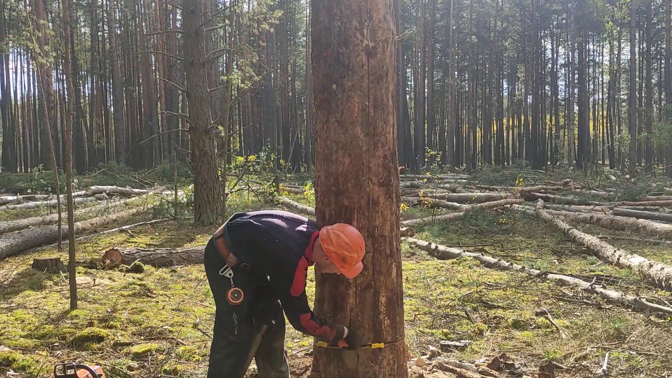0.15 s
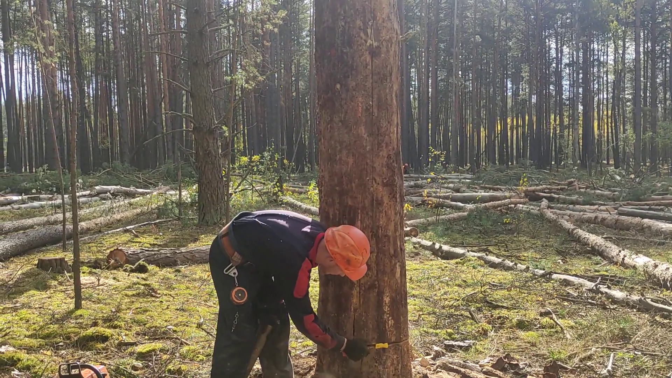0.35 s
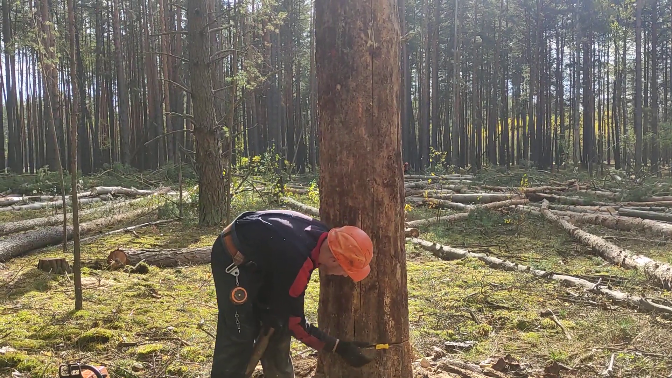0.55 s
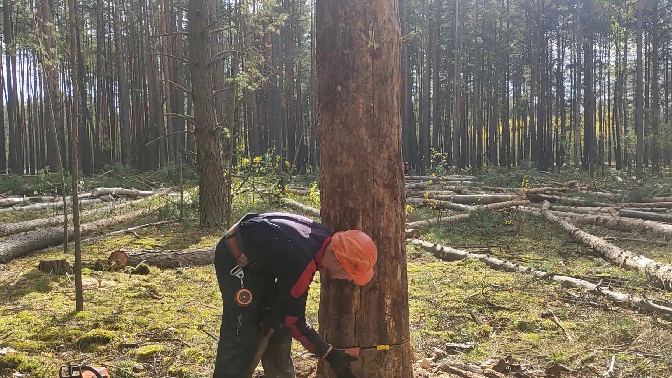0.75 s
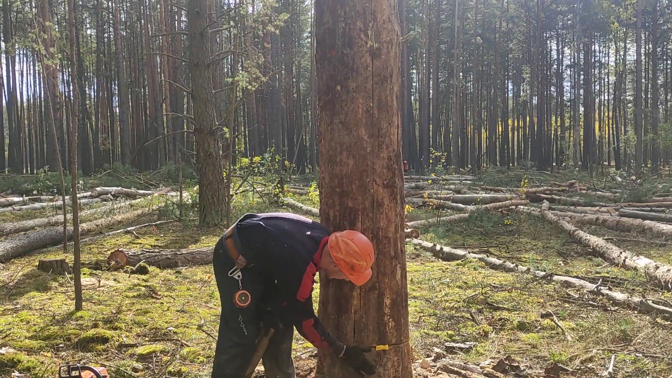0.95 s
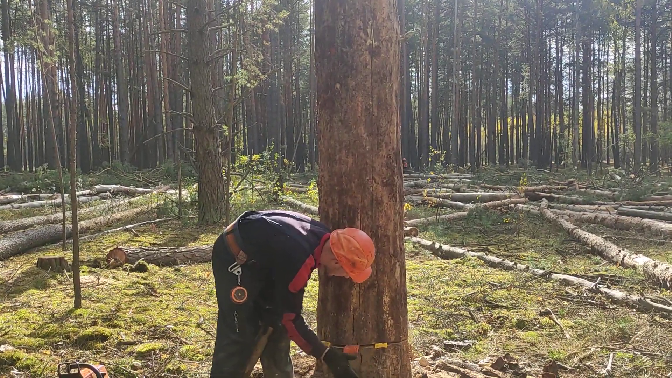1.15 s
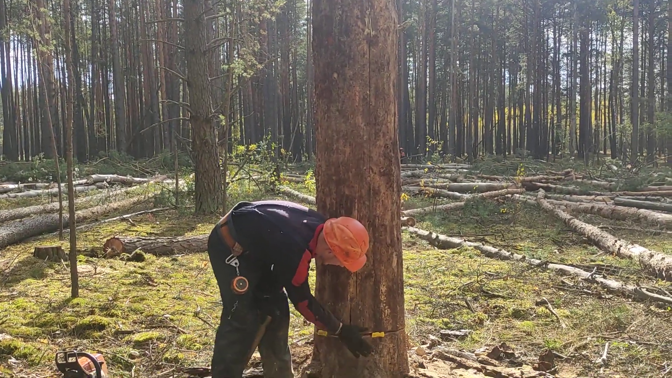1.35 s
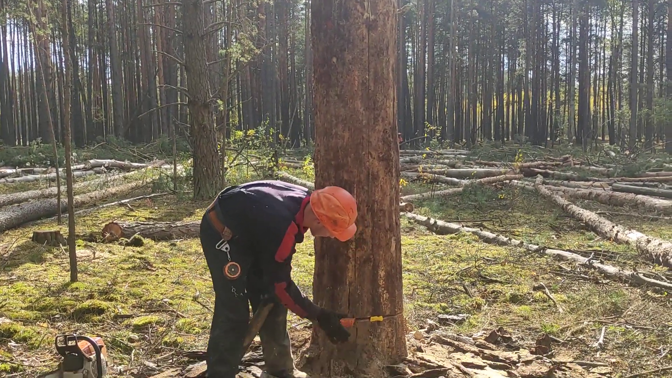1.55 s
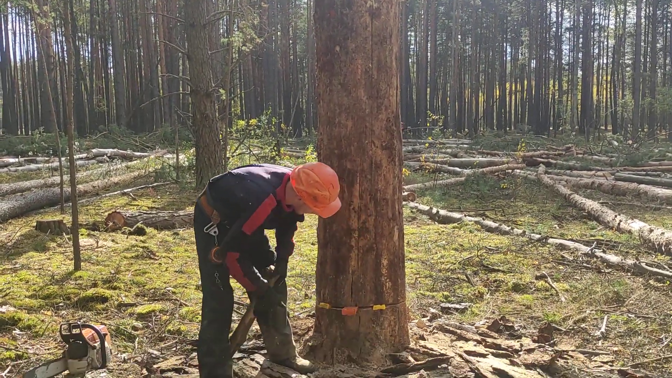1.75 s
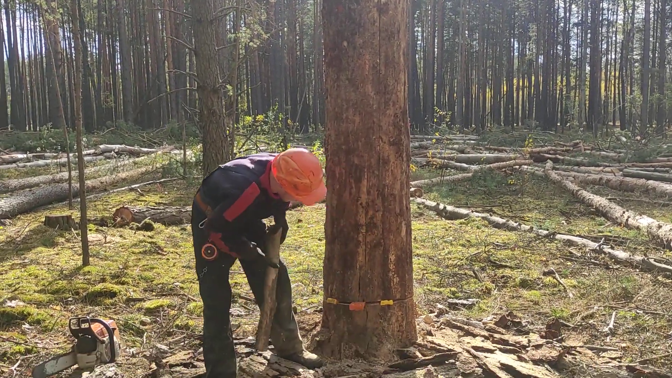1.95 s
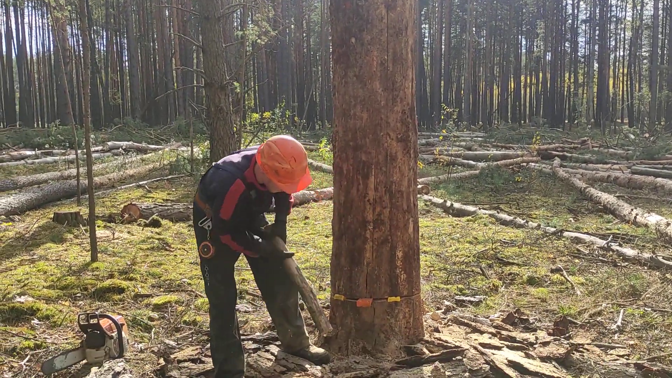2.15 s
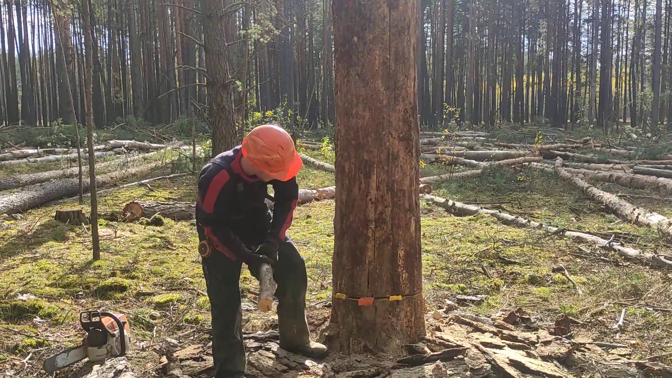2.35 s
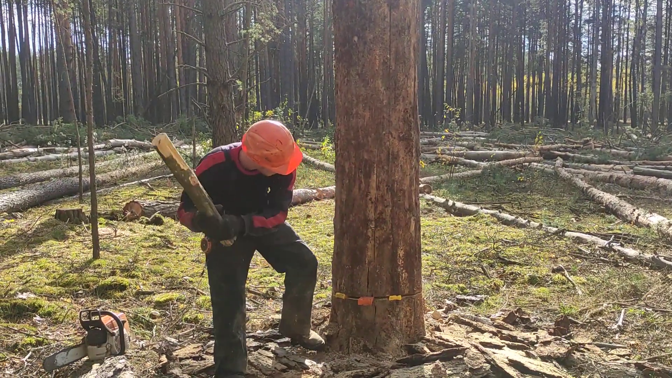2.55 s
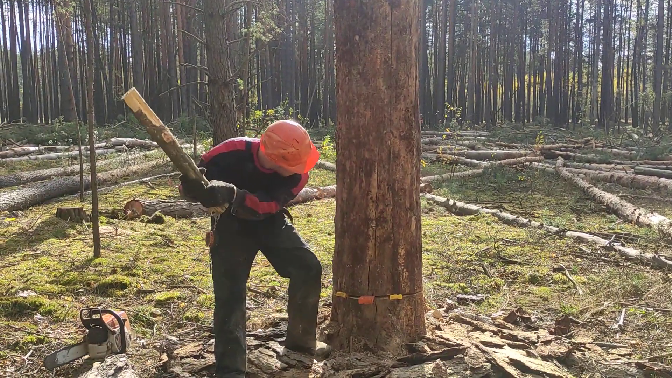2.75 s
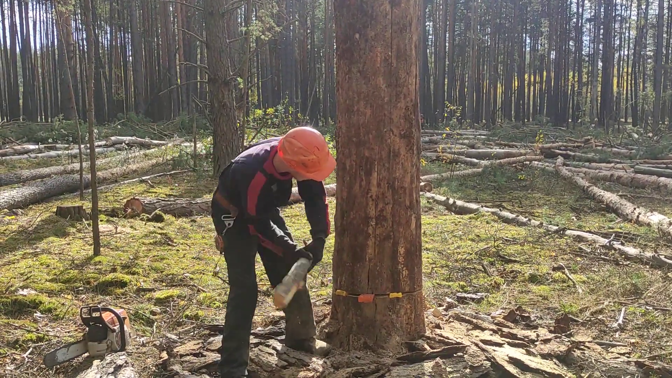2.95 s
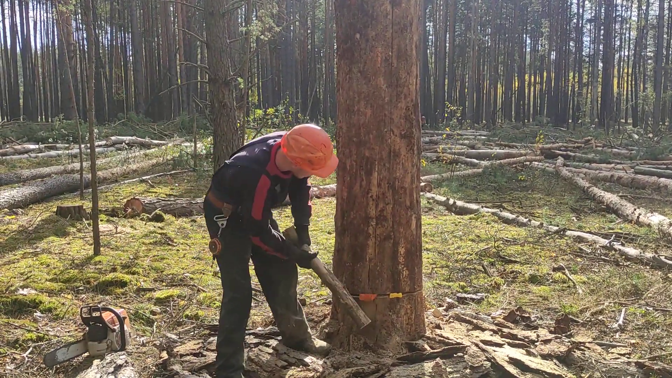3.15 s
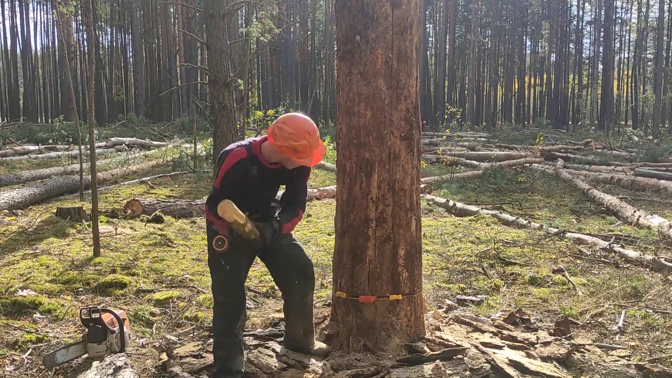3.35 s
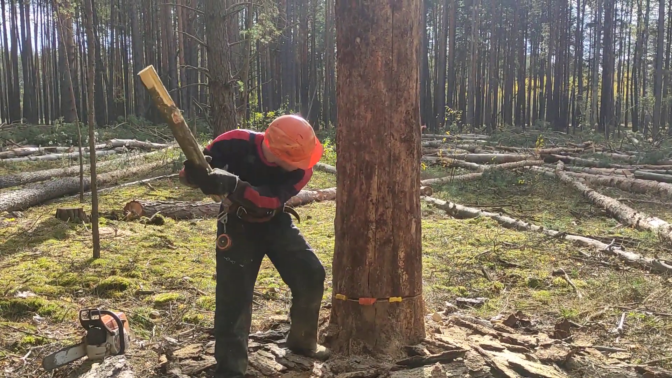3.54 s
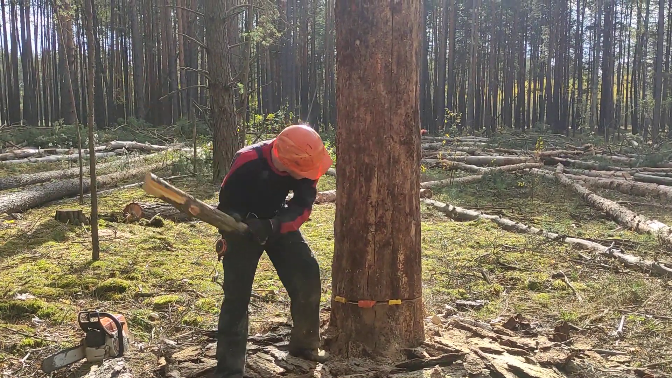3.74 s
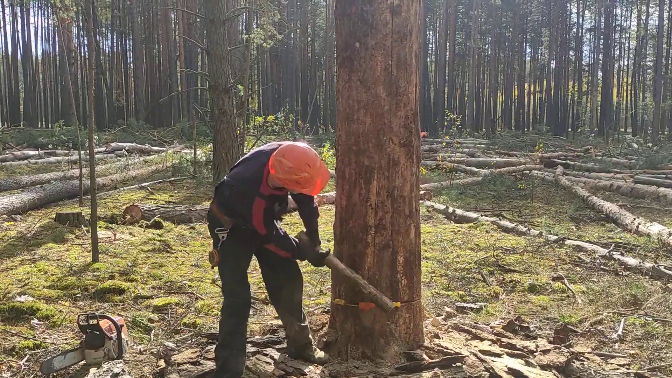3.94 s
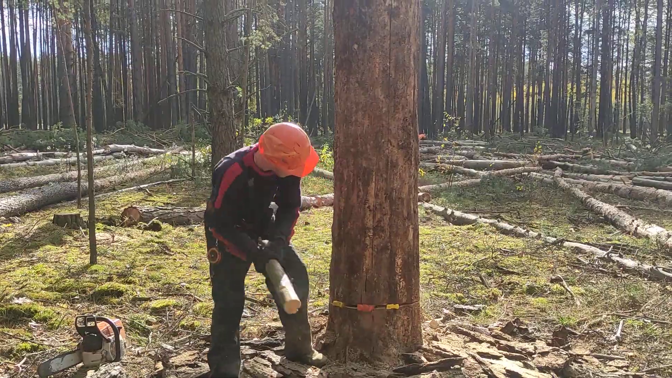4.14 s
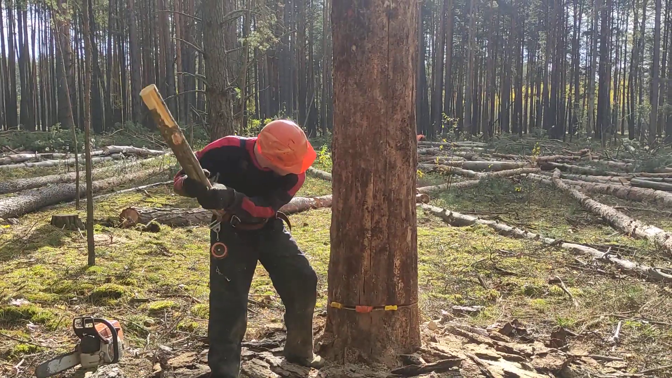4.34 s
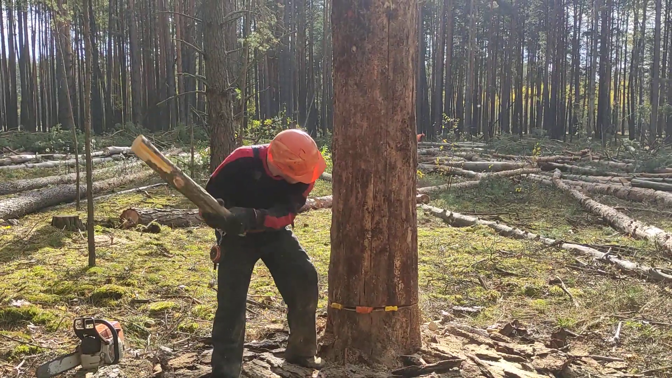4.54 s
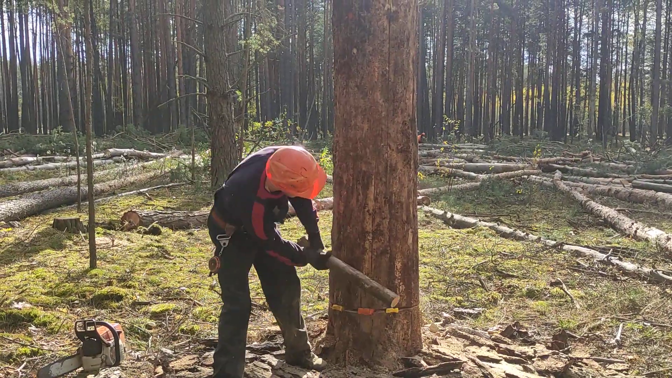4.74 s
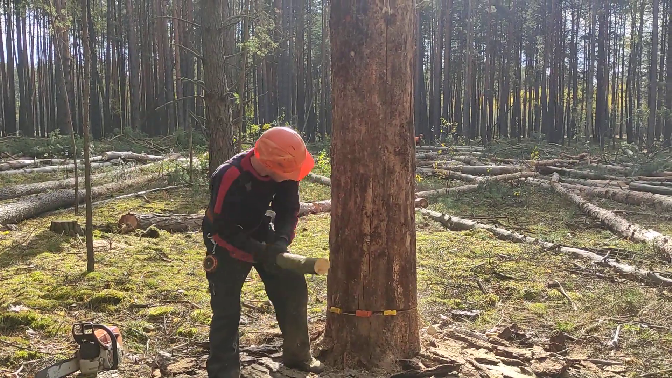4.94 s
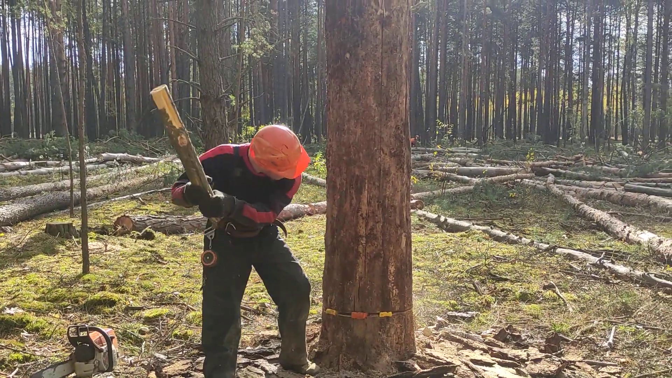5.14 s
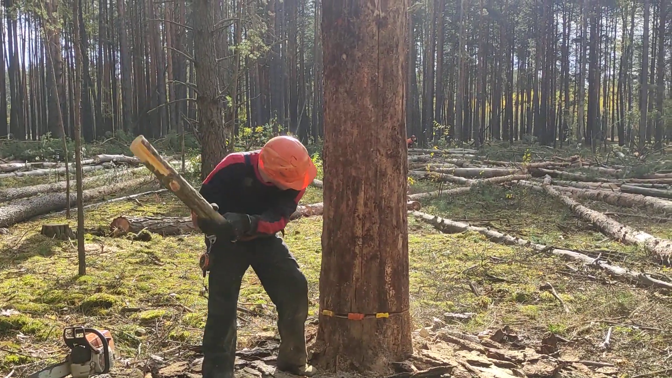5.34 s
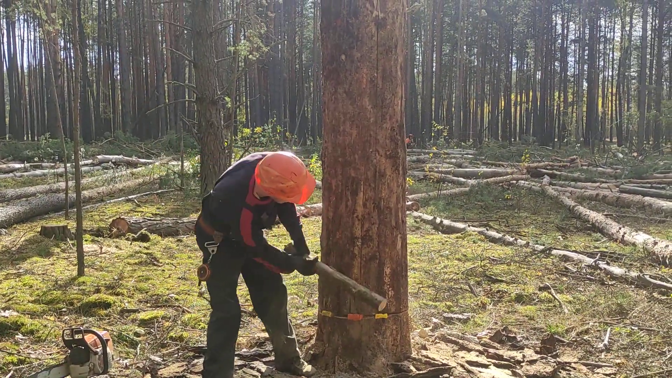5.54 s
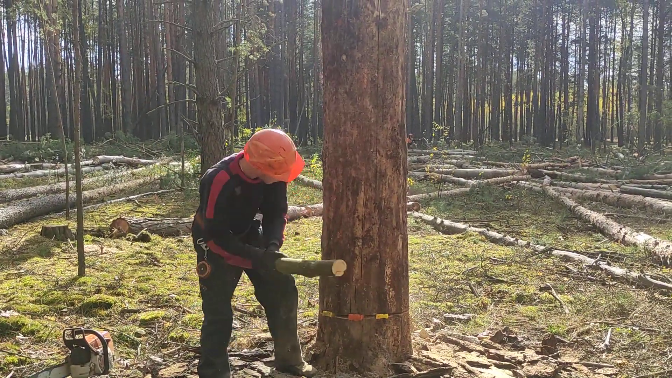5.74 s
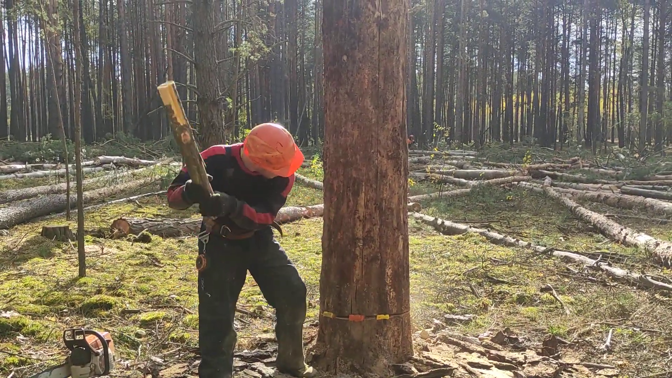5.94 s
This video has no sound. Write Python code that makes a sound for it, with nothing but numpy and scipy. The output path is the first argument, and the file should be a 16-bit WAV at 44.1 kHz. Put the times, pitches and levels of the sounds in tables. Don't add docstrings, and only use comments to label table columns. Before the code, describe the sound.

A quiet open forest, with soft steady wind in the crowns and low, lumpy wind bumps on a microphone a few metres from the worker, strongest around 0.4 and 1.6 s. Faint cloth rustle and small litter snaps open the scene. At 0.9 s a light, dull wooden tap sets the wedge; at 1.4 s a firmer, more ringing tap follows. From 1.5 to 3 s clothes rub, litter crackles, twigs snap, notably near 2.4 s, and thin dry clicks flick by. Heavy club blows land at about 3.1, 4.0, 4.8 and 5.6 s, each louder: blunt hollow knocks with a low thump, a brief ground shudder and a smeared echo swelling about a quarter second later. The second is short and hard; the last is loudest and fullest, slightly compressed. Rustling movements fill the gaps, the breeze strengthens towards the end, and the last echo fades by about 6.1 s.

```python
import sys
import numpy as np
from scipy import signal
from scipy.fft import rfft, irfft
from scipy.io import wavfile
from scipy.ndimage import uniform_filter1d

SR = 44100
rng = np.random.default_rng(int(sys.argv[2]) if len(sys.argv) > 2 else 0)


def int16_out(signal):
    q = np.round(np.clip(np.atleast_2d(signal).T, -1, 1) * 32767)
    wavfile.write(sys.argv[1], SR, q.astype(np.int16))


def magnitude_from_level(level_db):
    exponent = np.asarray(level_db, float) / 20
    return 10 ** exponent


N = 268569


def evened(x):
    return x / np.sqrt(np.mean(x ** 2) + 1e-20)


def read(points, hz):
    f, value = np.transpose(points)
    return np.interp(np.log(hz + 1), np.log(f + 1), value)


def coloured(x, points):
    hz = np.fft.rfftfreq(len(x), 1 / SR)
    return irfft(rfft(x) * magnitude_from_level(read(points, hz)), len(x))


def curve(rows):
    return magnitude_from_level(np.interp(np.arange(N) / SR, *np.transpose(rows)))


def swells(rows, rest_db):
    t = np.arange(0, N + 64, 64) / SR
    power = magnitude_from_level(rest_db) ** 2
    for middle, length, db in rows:
        power = power + magnitude_from_level(db - 24 * ((t - middle) / length) ** 2) ** 2
    return np.interp(np.arange(N) / SR, t, np.sqrt(power))


def flicker(size, depth_db):
    wander = uniform_filter1d(uniform_filter1d(rng.standard_normal(N), size), size)
    return magnitude_from_level(depth_db * evened(wander))


def add(mix, s, sound):
    part = mix[round(s * SR):][:len(sound)]
    part += sound[:len(part)]


def ring(x, hz, width):
    r = np.exp(-np.pi * width / SR)
    return signal.lfilter([1 - r, 0, r - 1], [1, -2 * r * np.cos(2 * np.pi * hz / SR), r * r], x)


# (time [s], level [dB])
BREEZE = [(0, -61.5), (1.37, -63.5), (1.95, -63), (2.78, -58), (3.5, -66.5), (4.1, -61), (4.65, -61.5),
          (5.0, -52.5), (5.45, -58), (5.85, -51.5), (6.09, -52.5)]
# (frequency [Hz], level [dB per Hz])
CROWN_COLOUR = [(88, -45), (150, -18.5), (284, 6), (334, 3.5), (661, -0.5), (987, -3.5), (1250, -21),
                (1760, -10), (3430, -42), (3750, -44.5), (5200, -36), (6760, -72), (11400, -120)]


def air():
    gusts = flicker(1500, 1.2)
    return curve(BREEZE) * magnitude_from_level(3.0) * gusts * evened(coloured(rng.standard_normal(N), CROWN_COLOUR))


# (middle [s], length [s], level [dB])
GUSTS = [(.3, 0.57, -44), (.95, 0.48, -53.5), (1.6, 0.3, -42.5), (2.0, 0.083, -52), (2.75, 0.81, -53.5),
         (3.4, 0.35, -44.5), (3.75, 0.21, -52.5), (4.15, 0.55, -51), (4.82, 0.13, -41), (5.12, .15, -42),
         (5.5, 0.12, -47), (5.9, 0.23, -54)]
# (frequency [Hz], level [dB])
WIND_COLOUR = [(20, -14.5), (40, 3.5), (70, 15), (130, 6), (220, 4), (400, -30.5)]
# (time [s], peak level [dB], frequency [Hz])
PUFFS = [(0.084, -48.5, 108), (0.139, -39, 88), (0.194, -41, 95), (0.4, -25, 197), (0.415, -27.5, 128),
         (0.461, -29, 114), (0.515, -35.5, 107), (0.538, -41.5, 137), (1.199, -37.5, 85), (1.517, -37, 112),
         (1.588, -28, 99), (1.612, -36.5, 113), (1.66, -36.5, 101), (1.741, -41, 115), (2.552, -40.5, 85),
         (2.789, -37, 162), (3.085, -30, 101), (3.199, -30, 239), (4.208, -39, 131), (4.911, -39, 209),
         (4.968, -40, 170), (5.034, -37, 140), (5.188, -33.5, 105), (5.204, -35, 98), (5.233, -39.5, 98),
         (5.764, -40, 172), (2.018, -38.5, 180), (5.833, -32.5, 137), (5.994, -40, 104), (6.034, -38, 82)]
CALM_DB = -56.5
PUFF_CYCLES = 0.87


def wind():
    lumps = flicker(900, 3.5)
    rumble = evened(coloured(rng.standard_normal(N), WIND_COLOUR))
    out = swells(GUSTS, CALM_DB) * magnitude_from_level(-10.0) * lumps * rumble
    t = np.arange(-1300, 1300) / SR
    for (s, db, hz), turn in zip(PUFFS, rng.random((len(PUFFS), 1))):
        shape = np.exp(-np.log(16) * (t * hz / PUFF_CYCLES) ** 2)
        add(out, s + t[0], magnitude_from_level(db) * shape * np.cos(2 * np.pi * (hz * t + turn)))
    return out


# (middle [s], length [s], effort [dB], crispness [dB])
MOVES = [(0.03, 0.2, -64, -6.5), (1.06, 0.26, -60.5, -23), (1.534, 0.2, -54, -8), (1.854, 0.22, -51, -8.5),
         (2.187, 0.9, -59, -15.5), (2.45, 0.29, -59.5, -10), (2.83, 0.52, -54, -12.5),
         (3.284, 0.38, -51, -23.5), (3.715, .4, -61, -10.5), (4.142, 0.28, -46, -32.5),
         (4.62, 0.61, -56, -19), (5.16, .3, -53.5, -20), (5.852, 0.51, -52.5, -31), (6.09, 0.29, -65, -10)]
REST_DB, REST_CRISP_DB = -66.5, -14
JOLT_DB, JOLT_S = -56.5, 0.058


def crispness():
    jolts = [(s, JOLT_S, JOLT_DB) for s, *_ in BLOWS[1:]]
    crisp = [(s, length, db + crisp_db) for s, length, db, crisp_db in MOVES]
    return swells(crisp + jolts, REST_DB + REST_CRISP_DB)


# (frequency [Hz], level [dB])
FIZZ = [(3600, -36), (4500, -6.5), (5600, -30), (5900, 0), (6700, -4.5), (7500, -4)]
# (frequency [Hz], level [dB])
CLOTH = [(300, 2), (700, -2.5), (1500, -1.5), (2300, -7), (3500, -12), (3800, -10.5), (5000, -19)]


def rustle():
    sizes = magnitude_from_level(4 * np.minimum(rng.exponential(1, N), 3))
    grains = evened(sizes * (rng.random(N) < 900 / SR) * rng.choice([-1, 1], N))
    clumps = flicker(130, 2.6) * flicker(1200, 1.8)
    fizz = clumps * evened(coloured(0.4 * grains + rng.standard_normal(N), [(3000, -50)] + FIZZ))
    cloth = clumps * evened(coloured(0.14 * grains + rng.standard_normal(N), CLOTH))
    effort = swells([move[:3] for move in MOVES], REST_DB)
    return crispness() * magnitude_from_level(5.0) * fizz + effort * magnitude_from_level(-7.5) * cloth


# (frequency [Hz], level [dB])
MICROPHONE_DIP = [(3400, -5.5), (3800, -5.5), (5400, 1.5), (5900, 3)]
CRACKLES_PER_S, CRACKLE_DB = 160, 5


def crackles():
    sizes = magnitude_from_level(4.5 * np.minimum(rng.exponential(1, N), 4))
    train = (rng.random(N) < CRACKLES_PER_S / SR) * sizes * rng.choice([-1, 1], N)
    snaps = evened(ring(train, 7000, 1500)) + magnitude_from_level(-8) * evened(ring(train, 2200, 2200))
    return magnitude_from_level(CRACKLE_DB - 9) * crispness() * coloured(snaps, MICROPHONE_DIP)


# (time [s], peak level [dB], treble [dB re peak], body [dB re peak])
TICKS = [(0.1485, -49, -5.5, -3), (0.168, -46, -20, 1), (0.2102, -39.5, -6, 2), (0.3358, -50.5, -8, -15),
         (0.9287, -27.5, -34, 6), (1.1476, -49.5, -1, -6), (1.388, -44.5, -1, -9), (1.4078, -47, -35, -31),
         (1.5284, -49.5, -18, 13.5), (1.5525, -30.5, -12, -1.5), (1.5858, -43, -7, -28),
         (1.6137, -49, 1, -15), (1.8798, -37, -3, -4), (1.939, -73, -13, -27), (2.0125, -39.5, -6.5, 3),
         (2.302, -47, 3.5, 16), (2.3957, -26, -9, -6.5), (2.4607, -44, 0, -4), (2.7836, -44, -4, -16),
         (2.8454, -47.5, 2, 1), (2.9623, -43, -24, 5), (3.0746, -46, -4.5, -18), (3.1924, -21.5, -45, 0.5),
         (3.358, -34.5, -12.5, -4), (3.6166, -44.5, 5, -14), (3.933, -54.5, 1, -10),
         (4.4648, -38.5, -5.5, -20), (4.8844, -46, -23, 12), (5.3884, -57, 0.5, 11), (5.5777, -48.5, 0, 0)]


def ticks():
    out, t = np.zeros(N), np.arange(900) / SR
    decay = np.exp(-t / 0.00057) + 0.13 * np.exp(-t / 0.0058)
    bursts = rng.standard_normal((len(TICKS), 900)) * decay * (1 - np.exp(-t / 0.00027))
    for (s, peak_db, treble_db, body_db), burst in zip(TICKS, bursts):
        parts = [ring(ring(burst, hz, w), hz, w) for hz, w in [(2020, 1230), (6570, 1800), (724, 430)]]
        levels = magnitude_from_level([peak_db, peak_db + treble_db + 3, peak_db + body_db])
        add(out, s, sum(g * p / abs(p).max() for g, p in zip(levels, parts)))
    return coloured(out, MICROPHONE_DIP)


# (frequency [Hz], level [dB])
CRACK = [(200, -17.5), (700, -76.5), (1600, 17), (3000, -27.5), (5000, -11), (6500, -2.5), (7600, -28)]


def blow(peak_db, contact_ms, thump_db, wood, later_ms, again_db, share, crack_db):
    t = np.arange(SR // 5) / SR
    late = t - later_ms / 1000
    again = magnitude_from_level(again_db) * (late > 0) * np.exp(-abs(late) / .002)
    grip = (np.exp(-t * 1000 / contact_ms) + again) * (1 - np.exp(-t / 0.0012))
    chatter = rng.standard_normal(len(t)) * grip
    first_push = .5 * np.exp(-((t - .0003) / .0001) ** 2)
    second_push = -.3 * magnitude_from_level(again_db) * np.exp(-(late / .0001) ** 2)
    drive = first_push + second_push + share * chatter
    tone = sum(magnitude_from_level(db) * ring(drive, hz, 0.55 * w + 55 + 0.012 * hz) for hz, w, db in wood)
    crack = magnitude_from_level(crack_db) * coloured(coloured(chatter, CRACK), MICROPHONE_DIP)
    knock = (tone + crack) * (t < 1 / 8)
    thump = np.sin(2 * np.pi * 82 * t) * np.exp(-((t - .005) / 0.0059) ** 2)
    return magnitude_from_level(peak_db) * knock / abs(knock).max() + magnitude_from_level(thump_db) * thump


# (delay [s], level [dB])
NEAR = [(0.01, -16.5), (.021, -19.5), (.031, -31.5), (.040, -26.5)]
# (frequency [Hz], level [dB])
BARK = [(200, -3.5), (1500, -6), (3000, -6.5), (5000, -11), (7500, -34.5)]
# (delay [s], level [dB])
FAR = [(.005, 4), (0.042, -10), (0.088, -3), (.16, -12.5), (0.242, -1.5), (0.351, -3), (.55, -10.5),
       (0.851, -14.5), (1.3, -12)]
# (frequency [Hz], level [dB])
FAR_COLOUR = [(100, 5), (300, -1.5), (1000, 2), (2000, -3), (3500, -16), (6000, -15)]


def forest(sound, echo_db, stretch, tilt_db):
    t = np.arange(int(1.5 * SR)) / SR
    delay, db = np.transpose(FAR)
    taps = rng.choice([-1., 0., 1.], len(t), p=[.04, .92, .04])
    colour = [(hz, gain_db + tilt_db * np.log2(hz / 1000)) for hz, gain_db in FAR_COLOUR]
    swell_db = np.interp(t, delay * stretch, db, left=-90)
    tail = coloured(taps, colour) * magnitude_from_level(swell_db + echo_db - 22.0)
    near = np.zeros(len(t))
    for s, near_db in NEAR:
        add(near, s, magnitude_from_level(near_db - 24.5) * rng.standard_normal(300) * np.hanning(300))
    tail += coloured(near, BARK)
    tail[0] = 1
    return signal.fftconvolve(sound, tail)


def shudder(db, start_hz, end_hz, t60):
    t = np.arange(SR // 2) / SR
    hz = end_hz + (start_hz - end_hz) * np.exp(-t / 0.11)
    turn = np.exp(2j * np.pi * np.cumsum(hz) / SR)
    r = np.exp(-np.pi * 130 / SR)
    slow = rng.standard_normal(len(t)) / turn
    for _ in range(2):
        slow = signal.lfilter([1 - r], [1, -r], slow)
    waves = (1 - np.exp(-t / .003)) * (1 + .8 * np.exp(-((t - .038) / .009) ** 2))
    return magnitude_from_level(db - 60 * t / t60) * waves * evened((turn * slow).real)


# (time [s], peak level [dB], contact length [ms], low thump [dB])
BLOWS = [
    (0.932, -15, 8.8, -46),
    (1.4300, -5, 3.8, -27),
    (3.1382, 1, 3.5, -27),
    (3.9910, 3.5, 1.92, -17.5),
    (4.819, 6, 3.8, -21),
    (5.6246, 7.5, 4.5, -18.5),
]
# (frequency [Hz], width [Hz], level [dB])
WOOD_1 = [(300, 60, -22), (536, 24, -2.5), (670, 20, 3.5), (859, 35, 4.5), (1790, 160, -4.5),
          (2086, 60, -8.5), (2700, 130, -37)]
WOOD_2 = [(304, 68, 2), (670, 22, 7.5), (929, 14, 1), (1800, 29, -3.5), (2105, 160, 2.5), (2620, 58, -32),
          (3400, 62, -61)]
WOOD_3 = [(353, 59, -3), (589, 246, 14), (935, 260, -21), (1730, 390, -16), (2480, 77, -73.5),
          (2720, 180, -29.5), (3400, 130, -30)]
WOOD_4 = [(293, 47, -18), (683, 360, 4.5), (927, 340, 6), (1267, 400, -2.5), (1595, 200, -1.5),
          (1930, 140, -21.5), (2600, 110, -34.5), (2810, 44, -17), (3400, 730, -25)]
WOOD_5 = [(307, 22, 3), (669, 230, -1.6), (830, 120, 4), (953, 180, 2.5), (1235, 550, -1), (1597, 240, 0),
          (2180, 100, -22), (3130, 460, -8)]
WOOD_6 = [(335, 17, 15.5), (582, 30, 16.5), (692, 390, 15), (1000, 900, -8), (1362, 610, 16),
          (1485, 110, -12.5), (2060, 150, -29), (2900, 250, -20)]
# (delay [ms], level [dB], chatter share [0-1], crack [dB])
REBOUND = [(5.8, 7.5, 0.44, -29), (1.935, 18, 0.11, -25), (2.817, 2.5, 0.25, -17), (2.34, -6, 0.36, -14.5),
           (1.3, -2.5, 0.09, -33.5), (1.31, -20, 0.08, -32)]
# (level [dB], delay [factor], tilt [dB per octave])
ECHOES = [(-39, 0.92, -9), (-34, 1.5, 2), (-31.5, 0.74, 3.5), (-27.5, 0.79, 3.5), (-33.5, 0.97, 3.4),
          (-29, 1.11, -1.5)]
# (level [dB], start frequency [Hz], end frequency [Hz], t60 [s])
SHUDDER = [(-35, 223, 120, 0.17), (-37, 240, 240, 0.27), (-40.5, 355, 100, 0.6), (-40, 220, 110, 0.43),
           (-31, 306, 124, 0.49), (-26.5, 370, 120, 0.4)]


def club():
    out, woods = np.zeros(N), (WOOD_1, WOOD_2, WOOD_3, WOOD_4, WOOD_5, WOOD_6)
    for (s, *hit), wood, again, echo, low in zip(BLOWS, woods, REBOUND, ECHOES, SHUDDER):
        add(out, s, forest(blow(*hit, wood, *again), *echo))
        add(out, s, shudder(*low))
    return out


# (time [s], peak level [dB])
CLICKS = [(1.515, -53), (1.625, -41), (1.7335, -50), (1.751, -46), (1.793, -44.5), (2.4308, -47),
          (2.4887, -44), (2.6608, -45), (2.704, -47), (2.7612, -42.5), (2.8177, -38), (2.8675, -47),
          (2.9084, -56), (2.9807, -41.5), (3.7065, -56), (3.7824, -50), (4.7037, -49), (5.125, -47),
          (5.237, -48)]


def clicks():
    out, t = np.zeros(N), np.arange(300) / SR
    bursts = rng.standard_normal((len(CLICKS), 300)) * np.exp(-t / 0.00087)
    for (s, db), burst in zip(CLICKS, bursts):
        add(out, s, magnitude_from_level(db) * burst / abs(burst).max())
    return magnitude_from_level(14) * (ring(out, 7000, 2300) + magnitude_from_level(-20) * ring(out, 2600, 3000))


def scene():
    return (air() + wind() + rustle() + crackles() + ticks() + club() + clicks())[None]


SPLIT_HZ = [310, 700, 1015, 3600, 5900, 7560]
# (width [Hz], level [dB])
SPLITS = [(50, -18), (165, -17), (70, -14), (70, -28), (70, -22), (110, -6)]


def limiter(x):
    loud = (x - np.clip(x, -.56, .56))[::-1]
    ahead = sum(magnitude_from_level(db + 18.5) * ring(loud, hz, w) for hz, (w, db) in zip(SPLIT_HZ, SPLITS))[::-1]
    ceiling = .93
    return ceiling * np.tanh((x + ahead) / ceiling)


def band_limit(x):
    return signal.sosfilt(signal.butter(12, 8910, fs=SR, output="sos"), x)


# (frequency [Hz], level [dB])
LIMITED_TONE = [(3500, 0.5), (3750, -8.5), (5000, -4.5), (5600, -2)]
EDGE_HZ = 7576
SQUASH = 0.069


def record(dry):
    held = limiter(dry[0])
    edge = signal.firwin(901, EDGE_HZ, window=("kaiser", 7), fs=SR)
    held = signal.oaconvolve(coloured(held, LIMITED_TONE), edge, "same")
    mix = (held - SQUASH * held ** 3)[None]
    return band_limit(mix)


dry = scene()
out = record(dry)
int16_out(out)
```